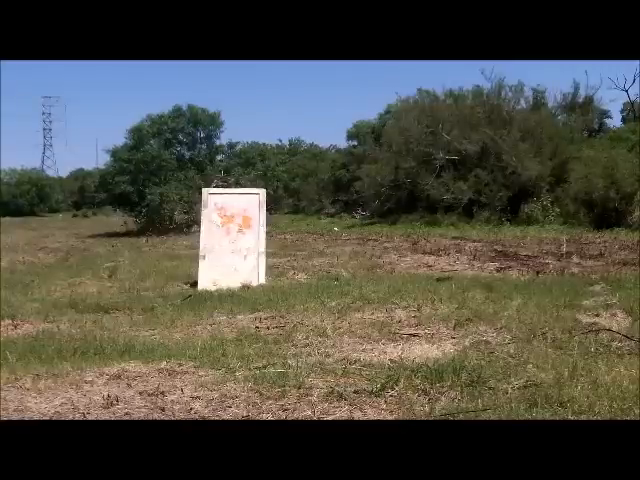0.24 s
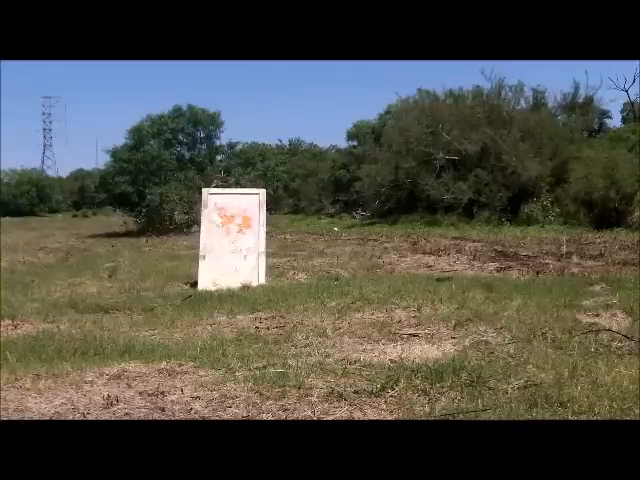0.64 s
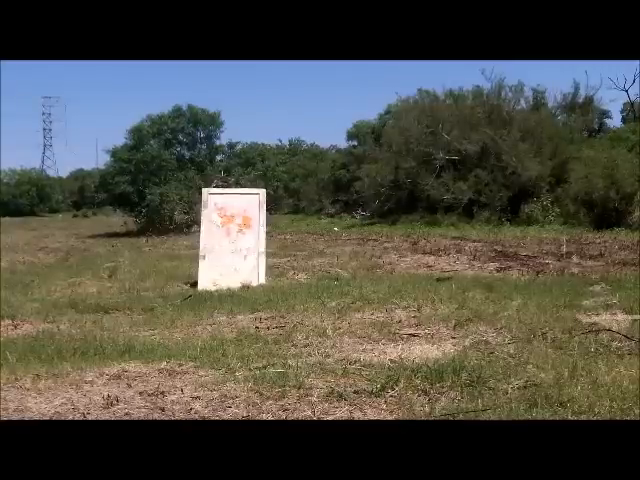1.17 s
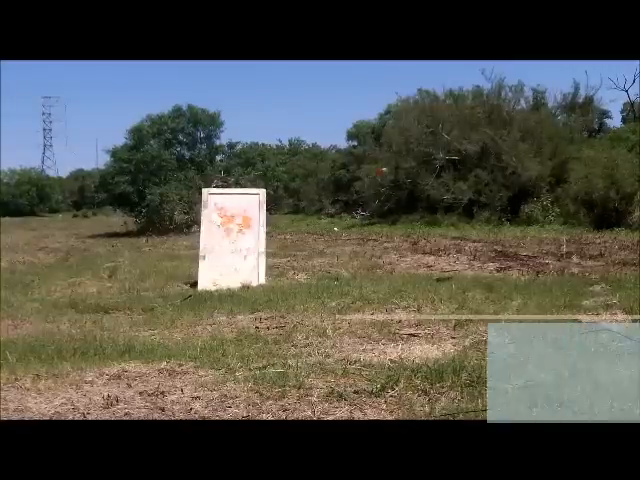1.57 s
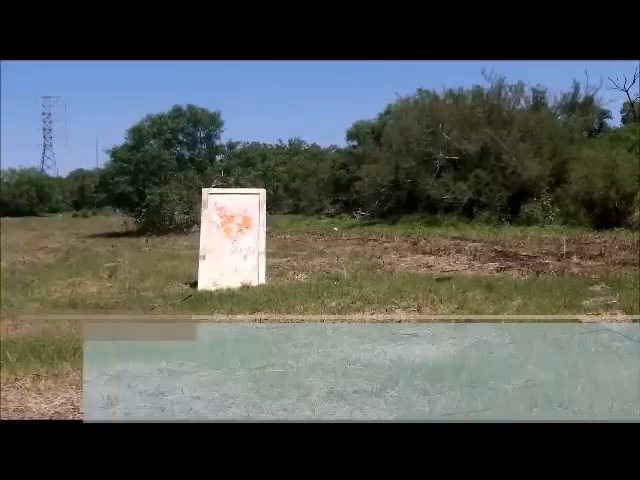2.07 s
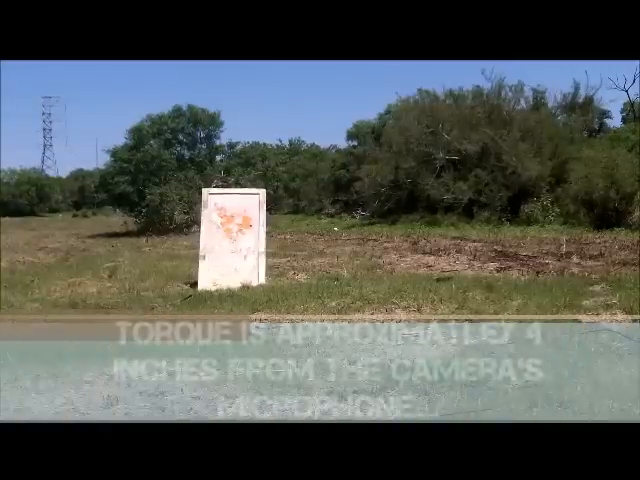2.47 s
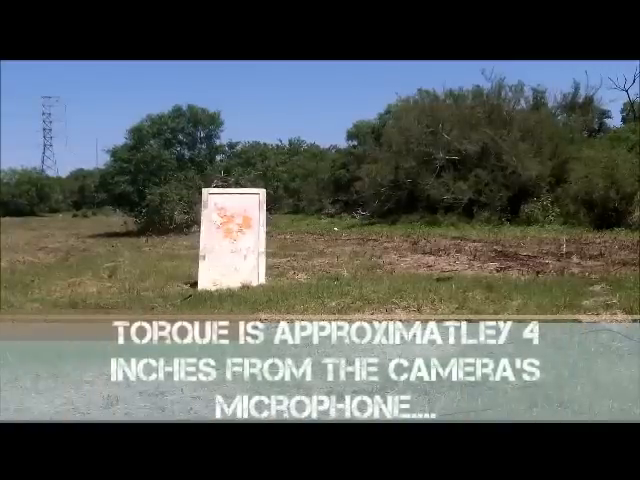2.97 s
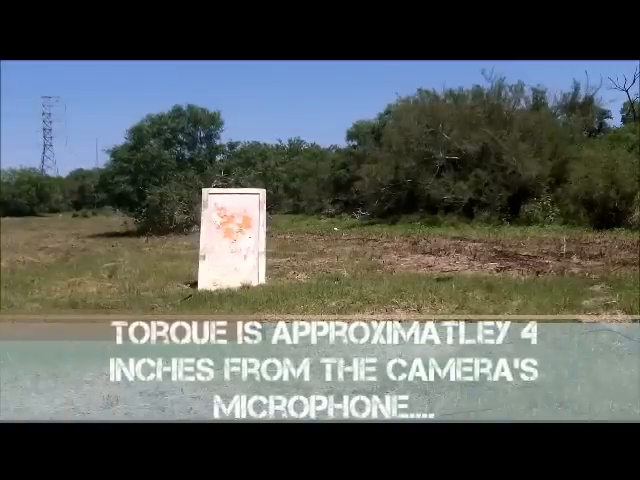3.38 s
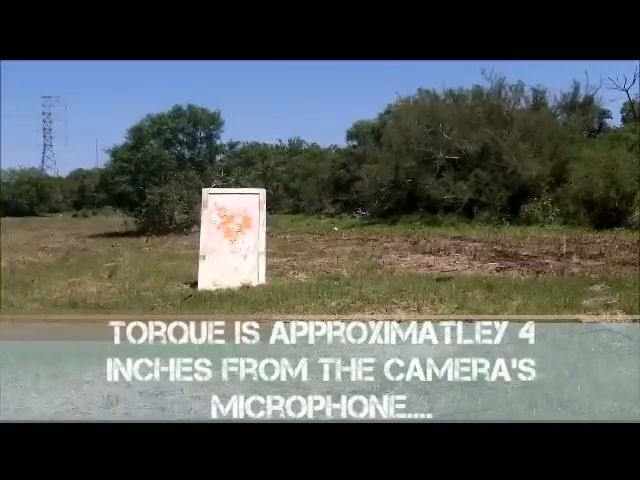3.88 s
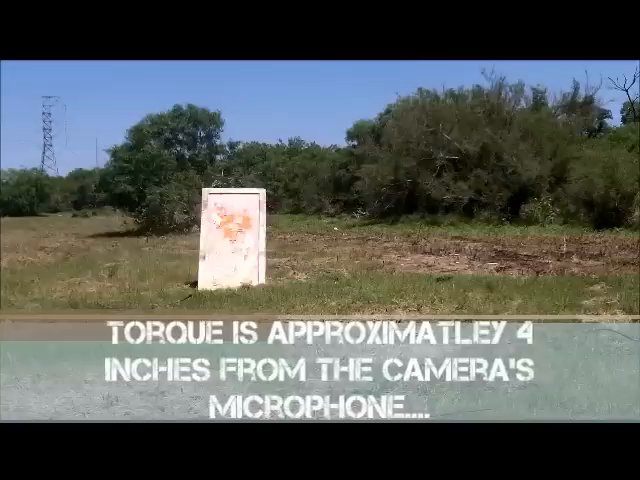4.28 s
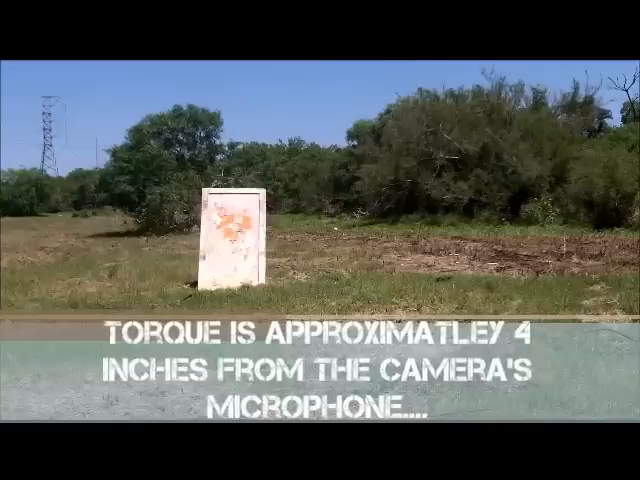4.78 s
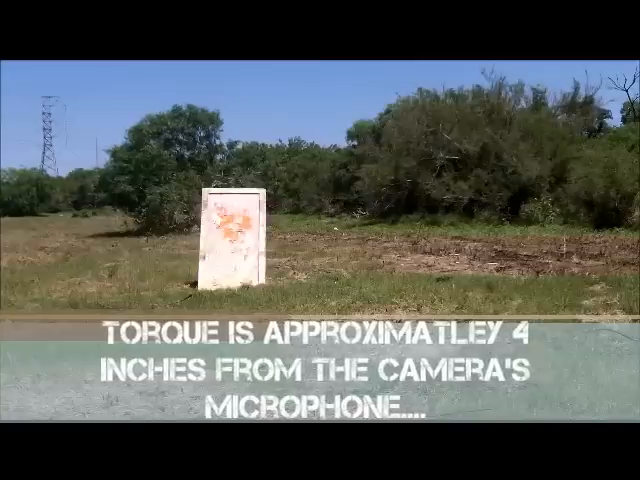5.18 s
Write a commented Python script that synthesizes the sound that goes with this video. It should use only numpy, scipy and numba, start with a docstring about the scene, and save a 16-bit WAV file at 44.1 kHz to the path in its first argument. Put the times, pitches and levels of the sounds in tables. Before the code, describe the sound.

Close, dry, loud marker shots dominate, squashed by a small camera microphone. A short quiet opening holds handling thumps and soft wind rumble; one shot leads into about three seconds of rapid fire, roughly seven per second, with distant door cracks between the shots. It stops, a bird chirps, and two spaced single shots end it, with diffuse echoes from a tree line.

```python
"""Hard, rapid cracks of a paintball marker, close beside a small camera in a breezy field: the bolt rings as
dying sines, while gas is barrel ringing, sharp pops and shaped noise. Each ball then smacks a door some metres
away, a ringing panel with a splash of noise and two echoes. A tree line returns a soft wash of fading noise.
Behind lie filtered-noise hiss and rumble, low bumps of a hand on the camera, and far birds and a cricket sung
as sines. The camera microphone colours it all and its limiter pulls down whatever passes its ceiling."""
import sys
import numpy as np
from scipy import signal
from scipy.fft import rfft, irfft, next_fast_len
from scipy.io import wavfile
from scipy.ndimage import uniform_filter1d
from numba import njit

SR = 44100
rng = np.random.default_rng(int(sys.argv[2]) if len(sys.argv) > 2 else 0)


def transcribe(u):
    """Save the signal u as a 16-bit wav file named by the first command-line argument.

    u: samples, shape (n,) or (channels, n), limited to [-1, 1]; the rate is SR.
    q: integer samples, one column per channel.
    """
    v = np.clip(np.atleast_2d(u).T, -1, 1)
    q = np.round(v * 32767).astype(np.int16)
    wavfile.write(sys.argv[1], SR, q)


N = 239639  # length in samples

# Steady background hiss: open-air hush low down, the microphone's own hiss at the top.
# Each row: frequency in Hz, relative level in dB.
HISS_SPECTRUM = [(60, -2), (120, 4.5), (300, -6), (1000, -9), (2000, -12), (3000, -14.5), (5000, -27),
                 (8000, -23), (12000, -12.5), (15000, 2.5), (15400, -41)]
# Low rumble on the microphone: breeze, stronger while the marker fires rapidly.
# Each row: time in seconds, level in dB before its random lumps.
RUMBLE_LEVEL = [(0.0, -52), (0.15, -44.5), (0.56, -39.5), (0.85, -36), (1.05, -46.5), (1.3, -35.5),
                (2.2, -32), (3.4, -38), (3.7, -45), (5.43, -53)]
# Colour of that rumble. Each row: frequency in Hz, relative level in dB.
RUMBLE_SPECTRUM = [(20, 0.5), (60, -13.5), (150, -12), (400, -34), (1000, -65)]
# Far bird notes. Each row: start in seconds, length in seconds, first Hz, last Hz, level in dB at the loudest.
BIRD_NOTES = [(.075, .06, 3900, 3980, -54), (.198, .042, 3300, 4800, -51), (.612, .035, 3450, 3500, -60),
              (1.1, .04, 3700, 4800, -51), (4.288, .06, 4000, 5000, -45), (4.635, .035, 4400, 4900, -56),
              (4.755, .035, 3900, 4800, -53)]
# Far cricket trills. Each row: start in seconds, length in seconds, level in dB before pulsing.
CRICKET_TRILLS = [(0, 0.041, -54), (.275, 0.021, -56), (.38, 0.02, -56), (.445, 0.0254, -58),
                  (0.483, 0.022, -56), (0.55, 0.0096, -56), (0.679, 0.015, -55), (4.881, 0.03, -57)]
# Hand shifting on the camera. Each row: start in seconds, relative level in dB, push time in seconds, direction +-1.
HAND_BUMPS = [(0.184, -24.5, 0.0032, -1), (.375, -20, 0.0089, 1), (0.522, -25, 0.0033, 1),
              (.571, -11.5, 0.0055, -1), (0.619, -18.5, 0.0028, -1), (.629, -15.5, 0.0024, 1)]
# Colour of the echo off the trees. Each row: frequency in Hz, relative level in dB.
TREE_SPECTRUM = [(100, -37), (400, 3), (800, -8), (1300, -1), (2000, -6), (2600, 1.5), (3300, -5),
                 (4500, -10.5), (7000, -18), (10000, -9), (12000, -33)]
# Trigger pulls. Each row: time in seconds, seconds until the ball is heard on the door.
TRIGGER_PULLS = [(0.813, .176), (1.1376, .1766), (1.3064, .1741), (1.4723, .1787), (1.61, .173),
                 (1.7527, .1802), (1.893, .1757), (2.0338, .1742), (2.1779, .1751), (2.325, .1716),
                 (2.4604, .1709), (2.5954, .1732), (2.7399, .1742), (2.8726, .1765), (3.0227, .1736),
                 (3.1772, .1778), (3.3298, .1752), (3.4791, .1759), (3.6411, .1749), (3.7976, .175),
                 (4.3489, .1784), (4.9866, .1743)]
# Gas charge of each pull in turn. Each entry: relative level in dB.
CHARGE_LEVELS = [0.5, -1, -2, -1.5, 0.5, 0.5, 2, 0.5, -4, 0, 0.5, 0, -7, -1, 0.5, 0, -1.5, -1, -2, -1.5,
                 -2.5, -1]
# How hard each ball bursts, in turn. Each entry: relative level in dB.
BURST_LEVELS = [6, 5.5, -14, 3.5, 4.5, 6.5, 2.5, -1, 4.5, 3.5, 5, 8, 2.5, 7, 5, 3, 2.5, -6, 3.5, 6.5, -1,
                3.5]
# Door panel resonances. Each row: frequency in Hz, relative level in dB, time to fall 60 dB in seconds.
DOOR_MODES = [(147.2, -35.5, 0.18), (162.7, -21, 0.19), (217, -16, 0.1), (267, -16, 0.09),
              (370.5, -22, 0.078), (417, -16, 0.08), (486, -22, 0.073), (514, -22, 0.03),
              (1190, -42, 0.0052), (1750, -10.5, 0.02), (2140, -2, 0.0035), (2620, 4, 0.0034),
              (3180, -18, 0.019), (4100, -40, 0.0058), (6030, -11, 0.0098), (9570, 7, 0.0013),
              (12440, 14, 0.0011)]
# A hit heard again off nearby ground and walls. Each row: delay in seconds, relative level in dB,
# smear in seconds, frequency in Hz above which it is dulled.
HIT_ECHOES = [(0.014, -11.5, 0.00072, 3500), (0.0484, -13, 0.002, 12000)]
# Metal body of the marker. Each row: frequency in Hz, time to fall 60 dB in seconds,
# relative level in dB when slammed forward, relative level in dB when dropped back.
BODY_MODES = [(448, 0.04, -29.5, -6), (950, 0.0038, -77, 0), (1076, 0.0088, -5, -21),
              (1260, 0.018, -9, -11), (1470, 0.0048, -15.5, -17), (2044, 0.0052, 0, -7),
              (2413, 0.018, -7, 0.5), (2920, 0.0082, -3, -18), (3113, 0.011, -5.5, -11),
              (3840, 0.024, -14, -8.5), (3930, 0.013, -6.5, -19), (4550, 0.02, -13, -7),
              (4905, 0.018, -27.5, -10.5), (5730, 0.0165, -15, -19), (6200, 0.0078, -3, -10)]
# Air column of the barrel. Each row: frequency in Hz, relative level in dB, time to fall 60 dB in seconds.
BARREL_MODES = [(178, 0.5, 0.024), (283.5, 3, 0.041), (419, -5, 0.048), (558.8, -4.5, 0.035),
                (829, -12, 0.028), (1224, -18, 0.017)]
# Hiss of the gas jet. Each row: frequency in Hz, relative level in dB.
JET_SPECTRUM = [(200, -3), (1000, -0.5), (2000, -3.5), (3200, 1.5), (5000, -8.5), (7000, -10), (10000, 0),
                (12000, -13.5), (14000, -21), (16500, -40)]
# Muzzle pops as the ball clears and the wave comes round again.
# Each row: mean time after the trigger in seconds, mean relative level in dB.
MUZZLE_POPS = [(0.0108, -3), (.0117, 3.5), (.0149, 5.5)]
# Brief shrill ring as the ball leaves. Each row: frequency in Hz, relative level in dB, time to fall 60 dB in seconds.
SHRILL_MODES = [(10567, 8, .008)]
# Microphone response. Each row: frequency in Hz, gain in dB.
MIC_RESPONSE = [(20, 2.5), (100, 1.5), (5000, 0.5), (6500, -5), (7300, -15), (8000, -60), (8800, -20),
                (10100, -16.5), (11500, -18), (15000, -40), (16500, -22)]

# Moments around the trigger (s): the bolt's soft first touch, forward slam and one softer rebound;
# then gas release, valve shut, bolt return, shrill ring
SLAM_S, GAS_S, SHUT_S, RETURN_S, SHRILL_S = (-.0007, .0001, .0014), .0105, .0343, .0505, .0152
BOLT_DB, BOLT_SHARE = 3.5, 0.46  # the bolt's blow: spring force, plus this share of the charge in dB
LEAK_S, LEAK_DB = 0.0058, -25  # gas seeps past the ball for this long before the main release
SLUR = 2.1  # exponent: a bird note's pitch moves mostly late
NOTE_PEAK, NOTE_ENDS_DB = .7, -8  # loudest at this share of the note, and the relative level at its start


def gain_of(db):
    """Turns dB into an amplitude factor."""
    return 10 ** (np.asarray(db) / 20)


def evened(x):
    """Scales to rms 1."""
    return x / np.sqrt(np.mean(x ** 2) + 1e-20)


def read(points, hz):
    """Reads a spectrum table at any frequency, along a log frequency axis."""
    f, value = np.transpose(points)
    return np.interp(np.log(hz + 1), np.log(f + 1), value)


def add(mix, s, sound):
    """Lays a sound into the mix at s seconds, cut off at the end."""
    part = mix[round(max(s, 0) * SR):][:len(sound)]
    part += sound[:len(part)]


def seconds(s):
    """Time axis lasting s seconds."""
    return np.arange(round(s * SR)) / SR


def noise(points, count):
    """Noise of rms 1 with the given spectrum."""
    size = next_fast_len(count)
    spectrum = rfft(rng.standard_normal(size)) * gain_of(read(points, np.fft.rfftfreq(size, 1 / SR)))
    return evened(irfft(spectrum, size)[:count])


def ring(modes, spread, rise):
    """A struck object: dying sines, a little different at each blow; rise in s."""
    t = seconds(.25)
    hz, db, t60 = np.transpose(modes)[:, :, None]
    level_change, pitch_change = rng.standard_normal((2, len(modes), 1))
    level = gain_of(db + 40 * spread * level_change - 60 * t / t60)
    sines = level * np.sin(2 * np.pi * hz * (1 + spread * pitch_change) * t)
    return sines.sum(0) * (1 - np.exp(-t / rise)) ** 2


def hiss_and_rumble():
    """Steady noise of open air and microphone, and lumpy low rumble, stronger during the rapid fire."""
    t = np.arange(N) / SR
    smooth = uniform_filter1d(uniform_filter1d(rng.standard_normal(N), size=2000), size=2000)
    lumps_db = evened(smooth) * 2.5
    hiss = gain_of(-41.5) * noise(HISS_SPECTRUM, count=N)
    rumble_db = np.interp(t, *np.transpose(RUMBLE_LEVEL)) + lumps_db
    return hiss + gain_of(rumble_db) * noise(RUMBLE_SPECTRUM, count=N)


def birds():
    """Far whistled notes: wavering sines, each scattered by leaves into a short haze."""
    out = np.zeros(N)
    for s, length, first_hz, last_hz, db in BIRD_NOTES:
        u = seconds(length) / length
        waver = evened(uniform_filter1d(rng.standard_normal(round(.1 * SR)), size=90))[:len(u)]
        hz = first_hz + (last_hz - first_hz) * u ** SLUR + 60 * waver
        tone = np.sqrt(2) * np.sin(2 * np.pi * np.cumsum(hz) / SR)
        # the level flutters too, by the waver read backwards
        level_db = db + NOTE_ENDS_DB * ((u - NOTE_PEAK) / NOTE_PEAK) ** 2 + 2.2 * waver[::-1]
        note = gain_of(level_db) * tone * signal.windows.tukey(len(u), .3)
        add(out, s, note)
        blur = evened(np.exp(-seconds(.08) / .025) * rng.standard_normal(round(.08 * SR)))
        add(out, s, gain_of(-39) * np.convolve(note, blur))
    return out


def cricket():
    """Far trills: a steady 4220 Hz tone pulsed 120 times a second."""
    out = np.zeros(N)
    for s, length, db in CRICKET_TRILLS:
        t = seconds(length)
        tone = np.sin(2 * np.pi * 4220 * t)
        pulses = 1 + .4 * np.sin(2 * np.pi * 120 * t)
        add(out, s, gain_of(db) * tone * pulses * signal.windows.tukey(len(t), .4))
    return out


def bumps():
    """A hand on the camera: a low push and its rebound, with the case humming briefly."""
    out, t = np.zeros(N), seconds(.08)
    for s, db, push_s, sign in HAND_BUMPS:
        u = t / push_s
        push = 5.5 * u ** 2 * (1.6 - u) * np.exp(-2.2 * u)
        case = gain_of(-13.5 - 1540 * t) * np.sin(2 * np.pi * 470 * t) * (1 - np.exp(-t / 0.0022))
        add(out, s, np.sign(sign) * gain_of(db) * (push + case))
    return out


def trees():
    """Each bang scatters back as noise: soon from the bushes, then swelling in from the far tree line."""
    t, out = seconds(1.6), np.zeros(N)
    near = np.exp(-t / 0.058)
    far = (t / 0.27) ** 3 / (1 + (t / 0.26) ** 3) * gain_of(-45 * t)
    bangs = [(s + GAS_S, db - 31.0, db - 31) for (s, _), db in zip(TRIGGER_PULLS, CHARGE_LEVELS)]
    bangs += [(s + flight, db - 40.5, db - 38.5) for (s, flight), db in zip(TRIGGER_PULLS, BURST_LEVELS)]
    for s, near_db, far_db in bangs:
        trunks = evened(uniform_filter1d(rng.standard_normal(len(t)), size=200))  # single trees stand out
        fade = gain_of(near_db) * near + gain_of(far_db) * far
        add(out, s, fade * gain_of(2.5 * trunks) * noise(TREE_SPECTRUM, count=len(t)))
    return out


def door():
    """Some metres off, a ball cracks on the panel, splashes, and comes back twice from nearby surfaces."""
    out, t = np.zeros(N), seconds(.04)
    for (fired, flight), db in zip(TRIGGER_PULLS, BURST_LEVELS):
        s = fired + flight
        hit = ring(DOOR_MODES, spread=.04, rise=.00003)
        splash = gain_of(-3 - 4700 * t) * noise(JET_SPECTRUM, count=len(t))
        add(hit, .0004, splash)
        add(out, s, gain_of(db - 8.5) * hit)
        for delay, echo_db, smear, dull_hz in HIT_ECHOES:
            taps = np.exp(-t / smear) * rng.standard_normal(len(t))
            taps[0] = 1.3  # a clear first return ahead of the scatter
            dulled = signal.lfilter(*signal.butter(1, dull_hz, fs=SR), hit)
            echo = np.convolve(dulled, taps / np.linalg.norm(taps))
            add(out, s + delay, gain_of(db - 15 + echo_db) * echo)
    return out


def bolt():
    """The bolt touches, slams forward and rebounds; later it drops back on another face. Loose parts scrape."""
    out, t = np.zeros(N), seconds(.03)
    swell = (1 - np.exp(-t / .0006)) ** 2
    # columns reordered to Hz, dB, t60 for ring()
    front, rear = np.array(BODY_MODES)[:, [0, 2, 1]], np.array(BODY_MODES)[:, [0, 3, 1]]
    for (s, _), charge_db in zip(TRIGGER_PULLS, CHARGE_LEVELS):
        db = BOLT_DB + BOLT_SHARE * charge_db
        blow = ring(front, spread=.012, rise=.00015)
        for at, step_db, sign in zip(SLAM_S, (-22, -12, -22), (1, -1, 1)):
            add(out, s + at, sign * gain_of(db + step_db) * blow)
        slam_scrape = gain_of(db - 16.5 - 3600 * t) * swell * noise(JET_SPECTRUM, count=len(t))
        add(out, s + SLAM_S[0], slam_scrape)
        add(out, s + SHUT_S, gain_of(db - 19.0) * blow)
        back = ring(rear, spread=.015, rise=.00015)
        add(out, s + RETURN_S, gain_of(db - 15.5) * back)
        return_scrape = gain_of(db - 21.0 - 1850 * t) * swell * noise(JET_SPECTRUM, count=len(t))
        add(out, s + RETURN_S, return_scrape)
    return out


def blast():
    """Gas kicks the barrel's air column, pops as the ball clears, and hisses in puffs until the valve shuts."""
    out, t = np.zeros(N), seconds(.06)
    valve = (1 - np.exp(-t / .0009)) ** 2 / (1 + np.exp((t - .021) / .002))  # quick opening, softer shutting
    pop = np.exp(-((t[:40] - .0004) / .00011) ** 2)
    seep = seconds(LEAK_S) / LEAK_S
    after = gain_of(-24 - 700 * t)  # what is left in the barrel once the valve has shut
    for (s, _), db in zip(TRIGGER_PULLS, CHARGE_LEVELS):
        column = ring(BARREL_MODES, spread=.035, rise=.0014)
        add(out, s + GAS_S, -gain_of(db + 2.0) * column)
        for at, pop_db in MUZZLE_POPS:
            pop_s = s + at + rng.normal(0, .00025)
            add(out, pop_s, -gain_of(db + pop_db + rng.normal(0, 2.5)) * pop)
        # unsteady puffing, around 230 to 310 puffs a second
        beat = (t - .0008) * rng.uniform(230, 310) + np.cumsum(rng.normal(0, .012, len(t)))
        puffs = 1 + .9 * np.exp(-(beat % 1) / .3)
        flow = gain_of(-620 * t) * valve * puffs + after
        add(out, s + GAS_S, gain_of(db - 5.5) * flow * noise(JET_SPECTRUM, count=len(t)))
        leak = gain_of(db + LEAK_DB) * seep * noise(JET_SPECTRUM, count=len(seep))
        add(out, s + GAS_S - LEAK_S, leak)
        add(out, s + SHRILL_S, gain_of(db) * ring(SHRILL_MODES, spread=.03, rise=.0004))
    return out


def scene():
    """Sums the near marker, the far door and the field into one channel."""
    shots = bolt() + blast() + door() + trees()
    background = hiss_and_rumble() + bumps() + birds() + cricket()
    return (shots + background)[None]


@njit
def limiter(x, ceiling, fall, rise):
    """Gain drops fast while the output is over the ceiling, and creeps back to 1; fall and rise per sample."""
    out, gain = np.empty_like(x), 1.
    for i in range(len(x)):
        out[i] = x[i] * gain
        gain = gain * fall if abs(out[i]) > ceiling else min(1., gain * rise)
    return out


def band_limit(x):
    """A steep low-pass at the top of the band."""
    return signal.sosfilt(signal.butter(12, 16500, fs=SR, output="sos"), x)


def record(dry):
    """Microphone colour with a deep notch near 8 kHz, a limiter, and a soft ceiling."""
    log_gain = np.log(gain_of(read(MIC_RESPONSE, abs(np.fft.fftfreq(4096, 1 / SR)))))
    # minimum phase: the response starts at once, with no ringing ahead of a bang
    taps = np.fft.ifft(np.exp(np.conj(signal.hilbert(log_gain)))).real[:2048]
    heard = signal.oaconvolve(dry[0], taps)[:N]
    # gain falls at 30000 dB/s and recovers at 75 dB/s
    held = limiter(heard, gain_of(-8.2), gain_of(-30000 / SR), gain_of(75 / SR))
    top = gain_of(-5.2)
    finished = held / (1 + abs(held / top) ** 8) ** (1 / 8)
    return band_limit(finished[None])


dry = scene()
out = record(dry)
transcribe(out)
```